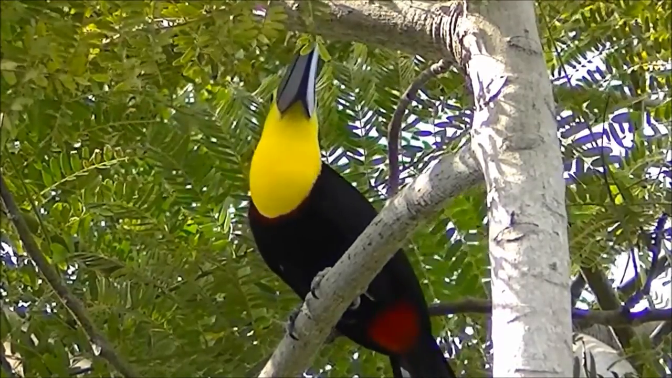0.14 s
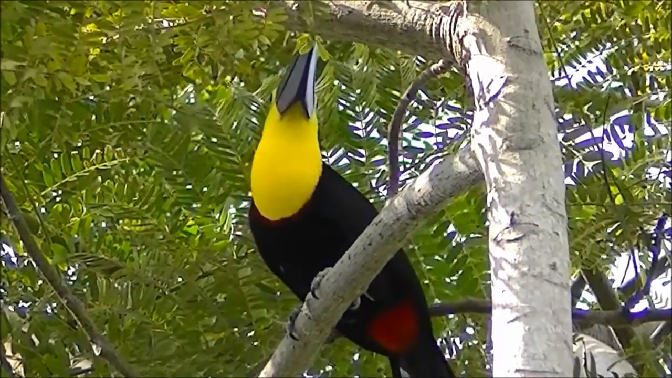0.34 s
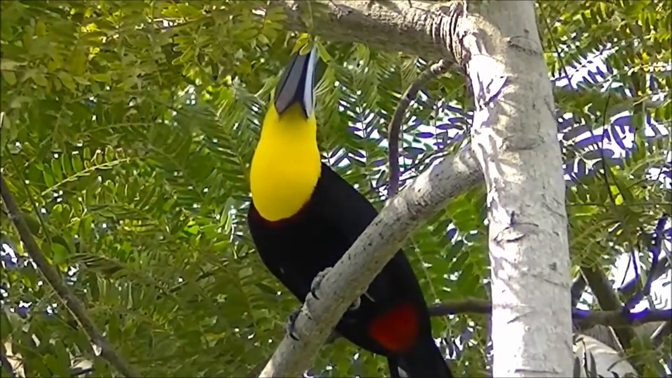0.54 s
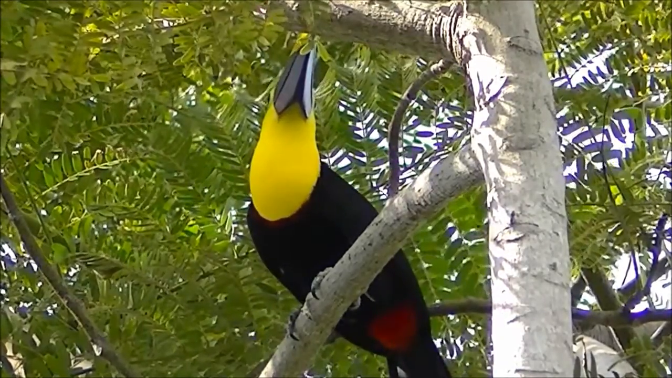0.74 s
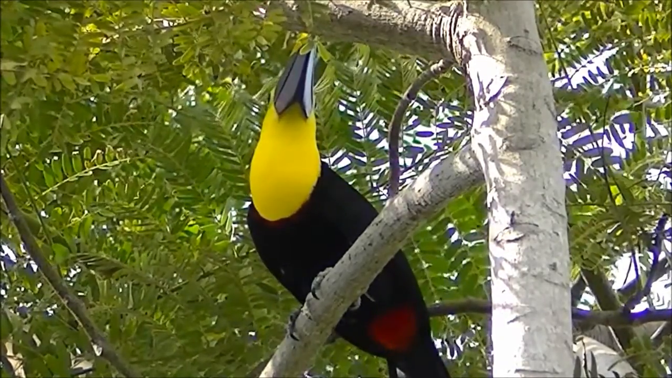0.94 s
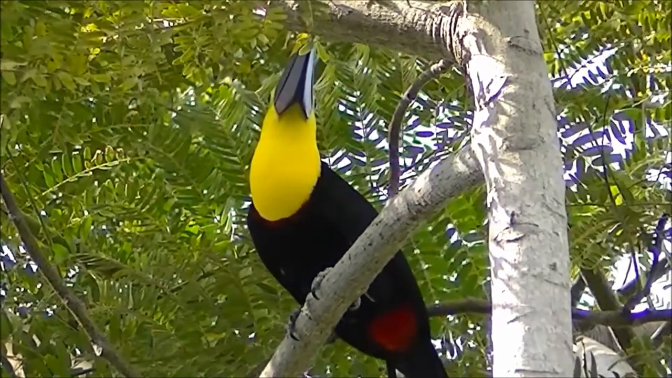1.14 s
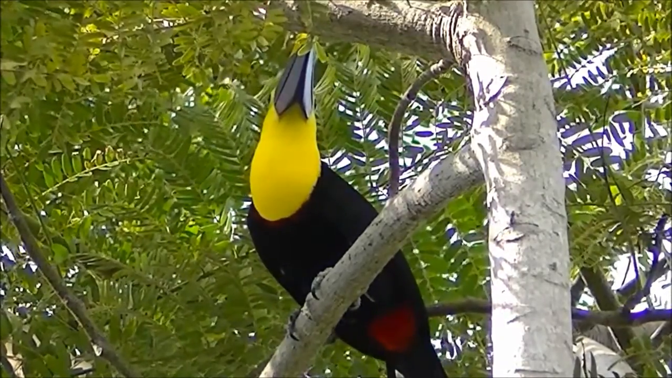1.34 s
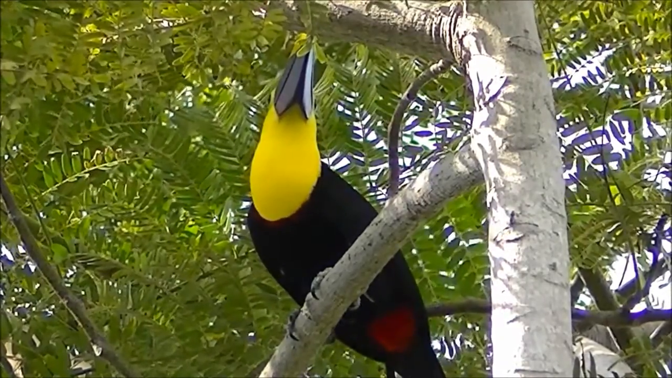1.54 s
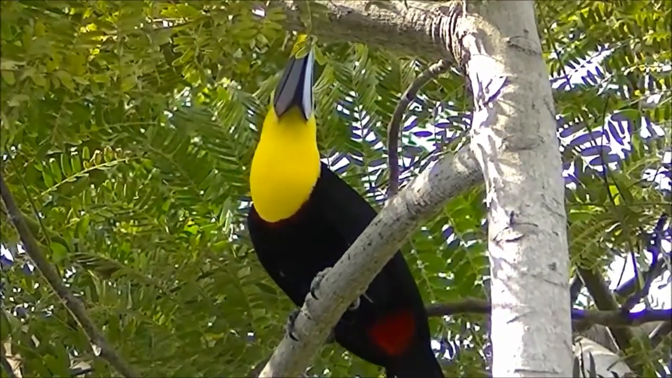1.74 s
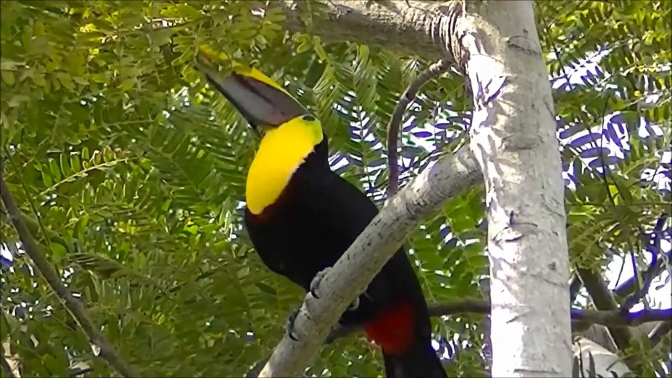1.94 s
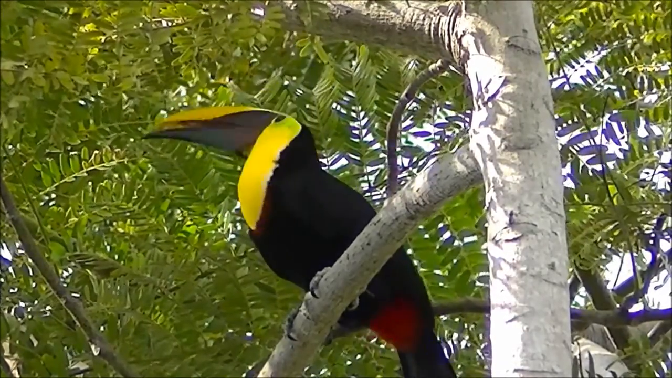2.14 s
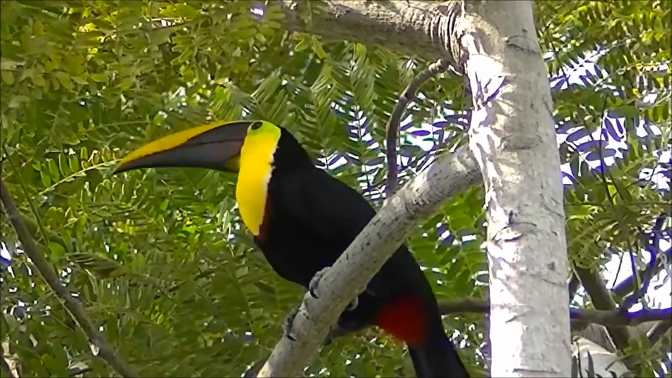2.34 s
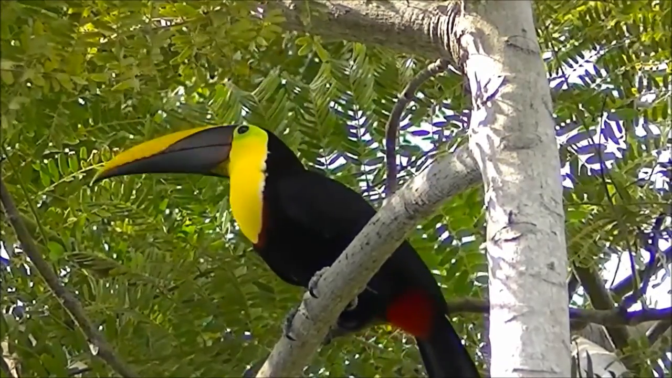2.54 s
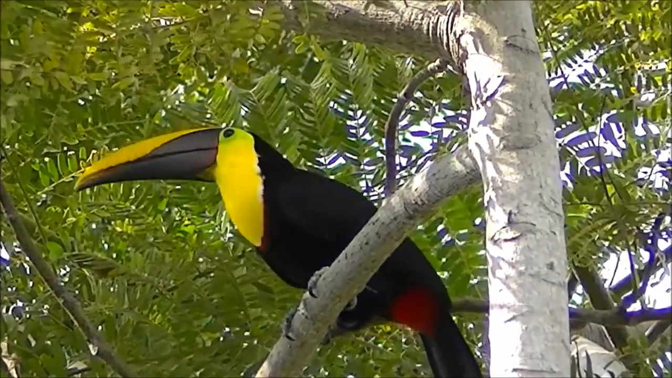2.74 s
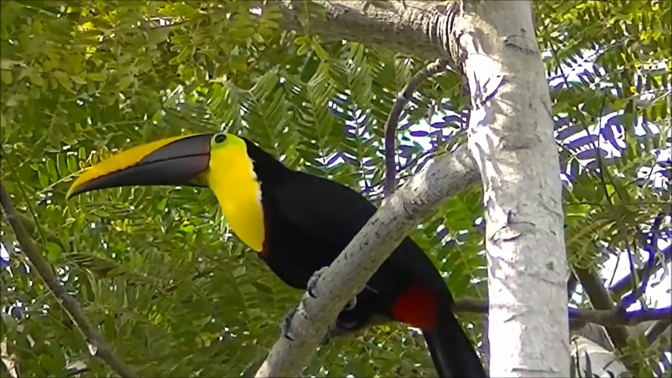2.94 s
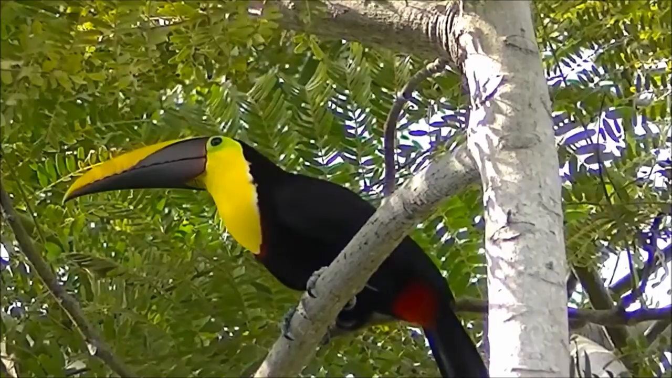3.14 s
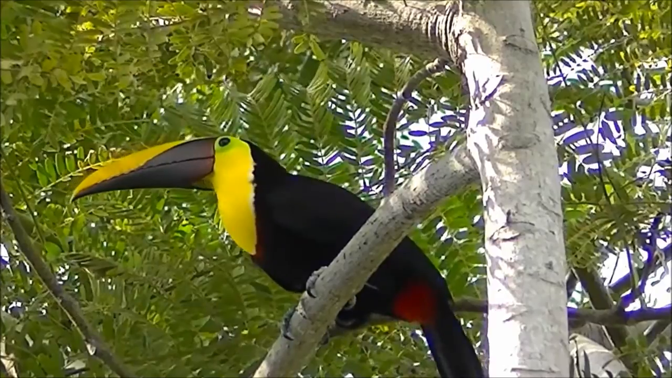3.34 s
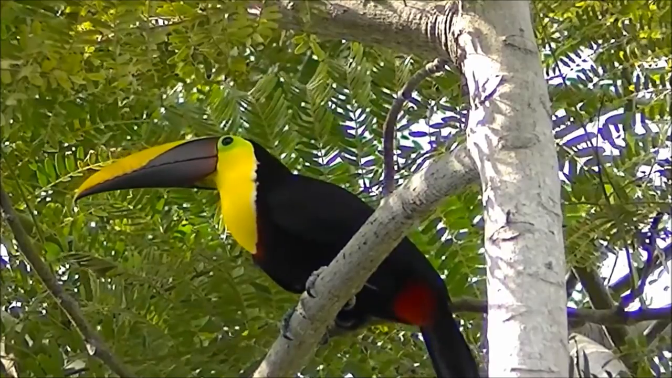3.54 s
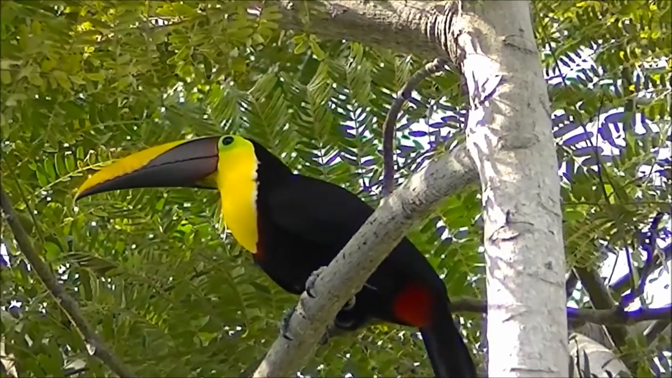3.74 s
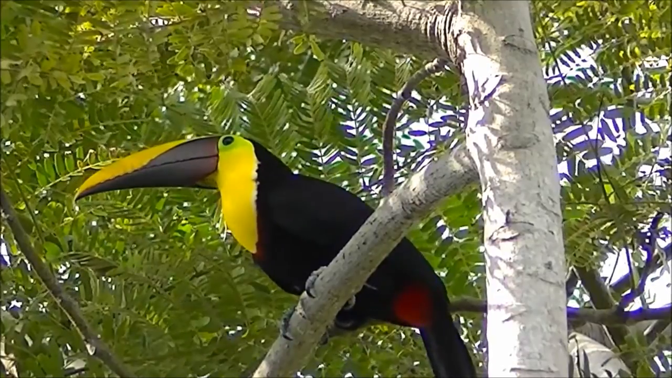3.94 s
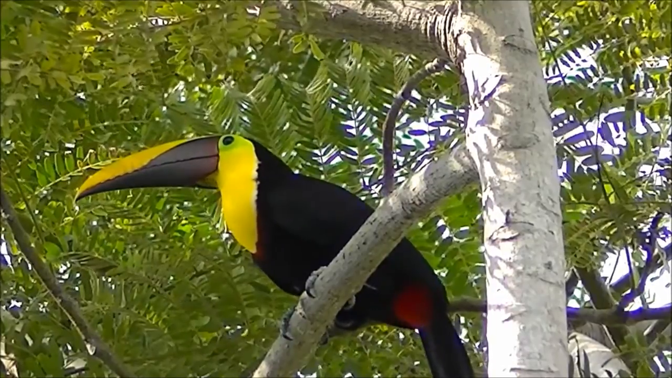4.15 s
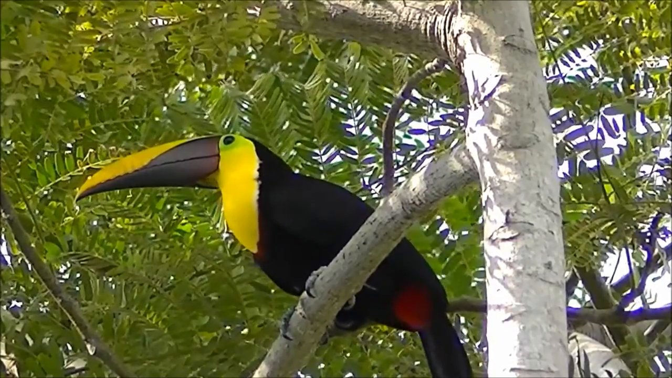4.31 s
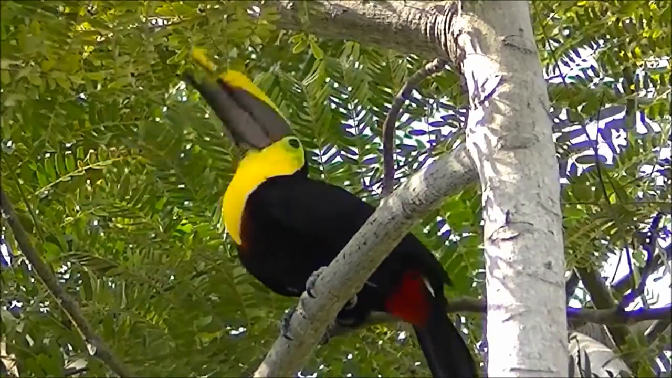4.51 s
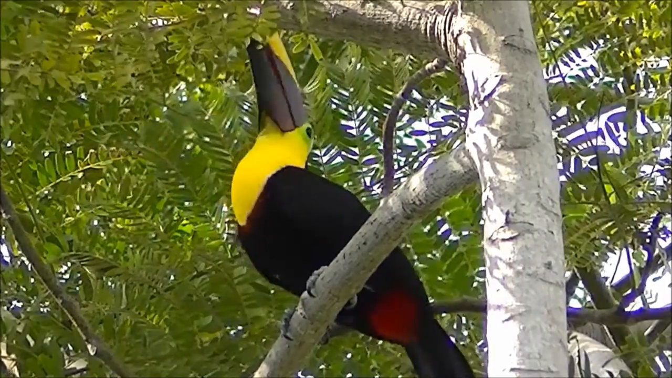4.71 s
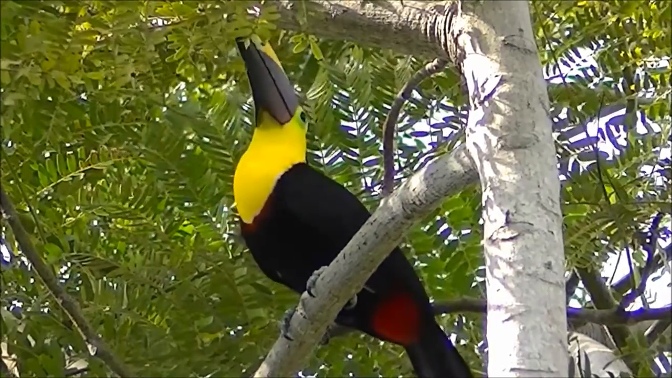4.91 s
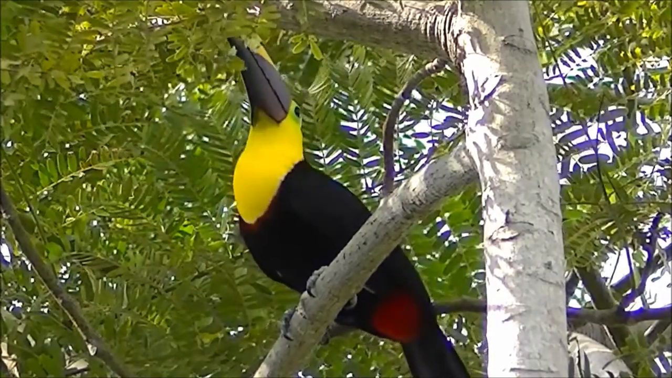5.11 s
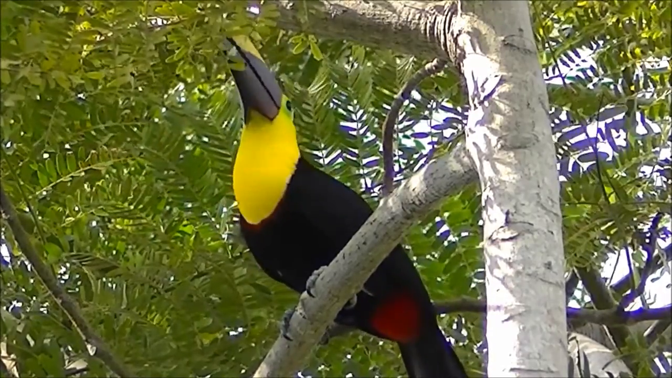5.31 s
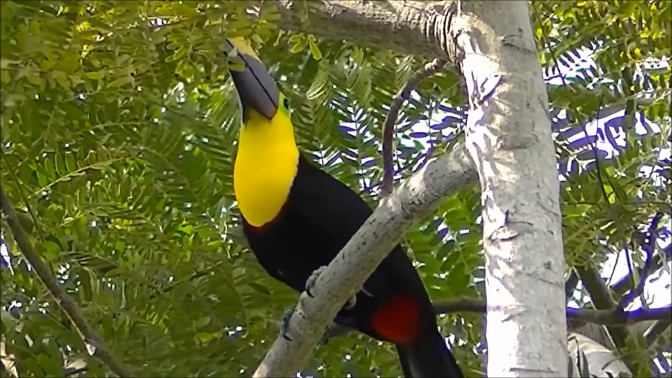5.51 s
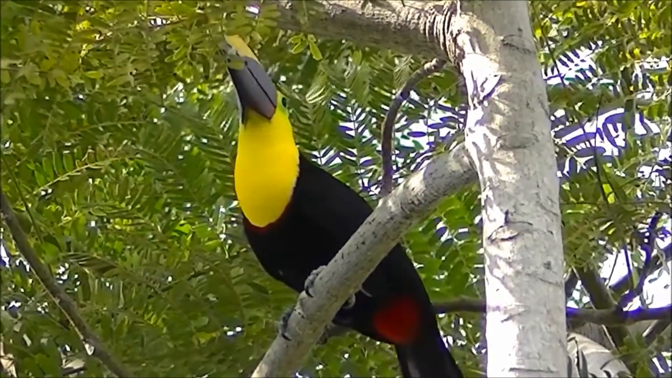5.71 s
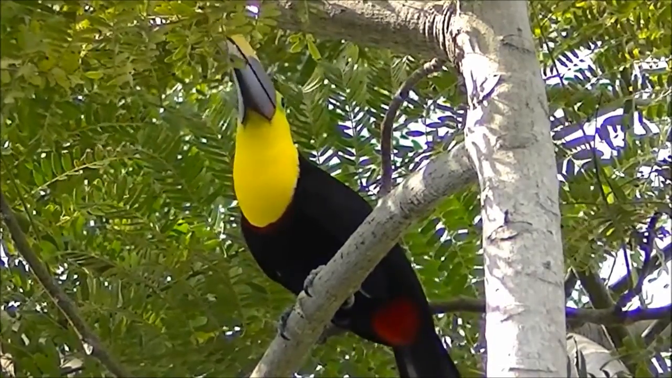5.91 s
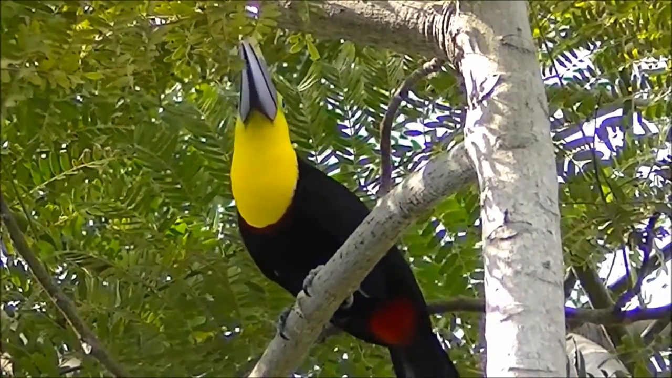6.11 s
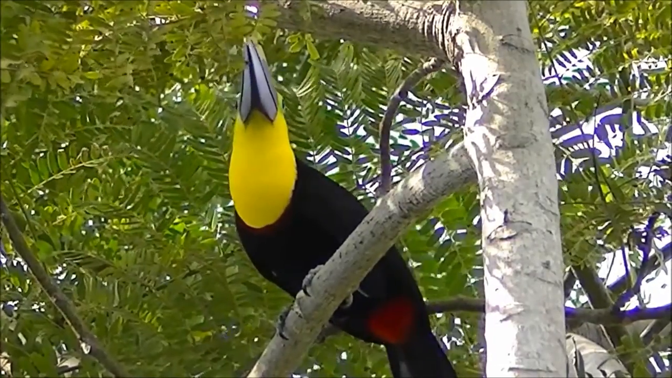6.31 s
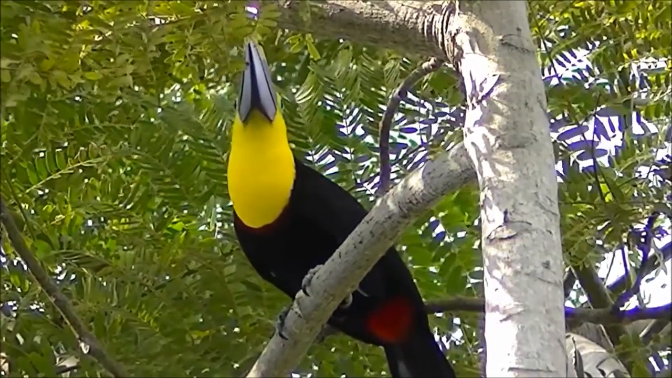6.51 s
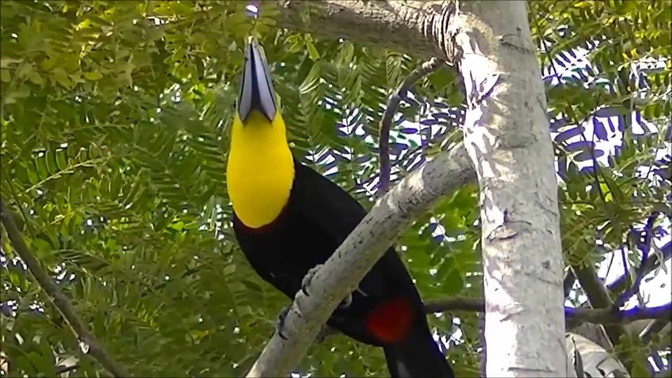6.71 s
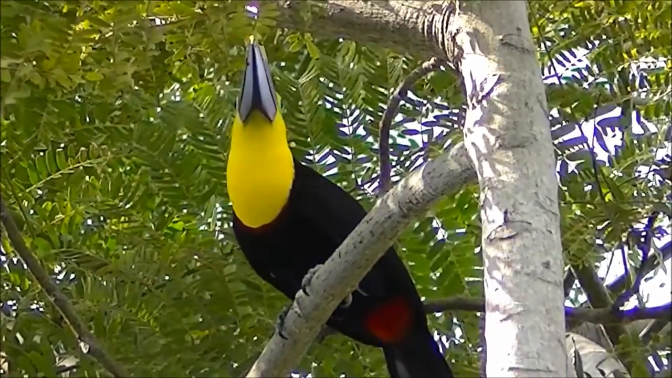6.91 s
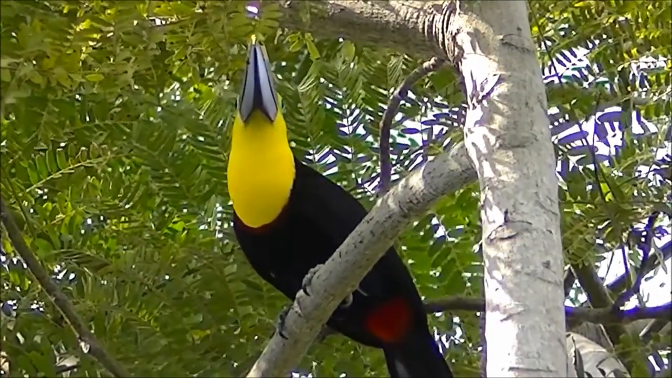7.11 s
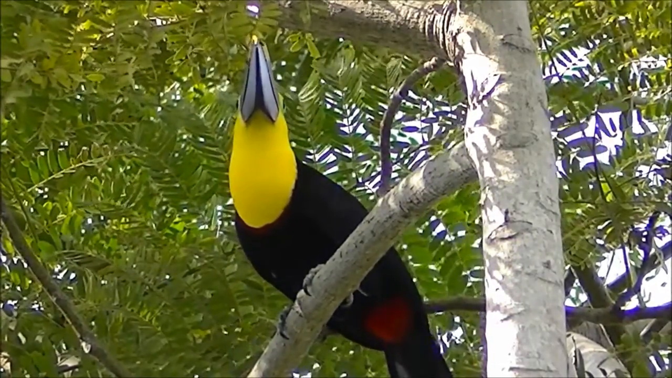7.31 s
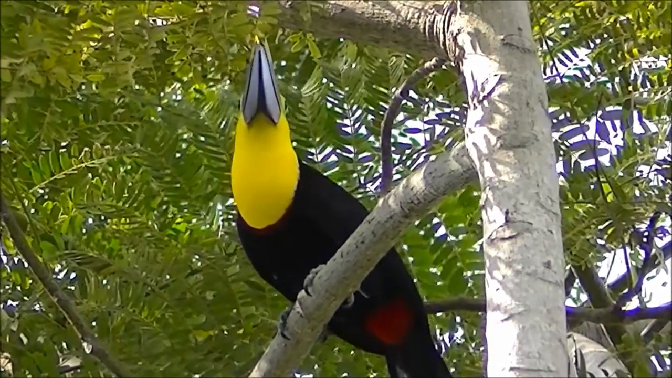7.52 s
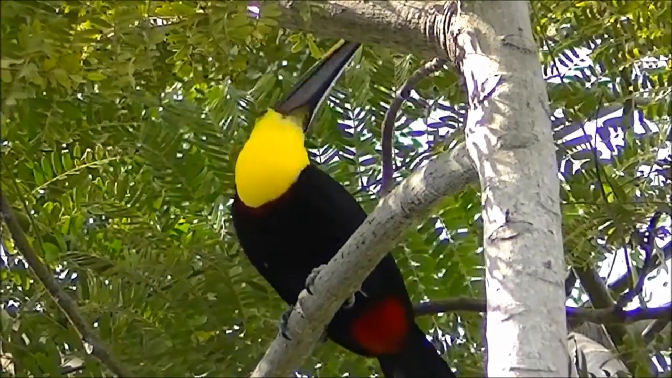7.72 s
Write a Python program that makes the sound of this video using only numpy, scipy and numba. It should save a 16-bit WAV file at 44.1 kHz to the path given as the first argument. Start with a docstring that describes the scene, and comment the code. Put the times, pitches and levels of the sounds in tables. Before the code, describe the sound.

Spaced, gliding toucan yelps ring through tropical treetops, with a higher voice and a distant answer, above faint insects, tiny chirps and low rushing.

```python
"""First the forest echo of a yelp just past rings on, over a low distant rush and hissing insects.
Then toucans yelp in the treetops: one near, a higher-voiced one and a far one answering.
Each yelp is a gliding whistle with overtones; trunks and leaves scatter it into a tail of shaped noise.
Small birds chirp in thin sine sweeps, and a few short bright noise bursts are heard.
An automatic gain control turns everything down after loud yelps, then creeps back."""
import sys
import numpy as np
from scipy import signal
from scipy.fft import rfft, irfft, next_fast_len
from scipy.io import wavfile
from scipy.ndimage import uniform_filter1d
from numba import njit

SR = 44100
rng = np.random.default_rng(int(sys.argv[2]) if len(sys.argv) > 2 else 0)


def invert_db(level):
    """Linear amplitude ratio for a level in decibels (20 dB per decade), elementwise."""
    return 10 ** (np.asarray(level, dtype=float) / 20)


def pcm_store(signal):
    """Save signal as 16-bit PCM."""
    levels = np.round(np.clip(np.atleast_2d(signal), -1, 1) * 32767)
    wavfile.write(sys.argv[1], SR, levels.astype(np.int16).T)


N = 346626
LEAD = SR // 2  # samples made ahead of 0 s and cut off at the end
M = N + LEAD


def on_log_hz(table, hz, column=1):
    """Reads a column of a table that starts with Hz, on a log-frequency axis."""
    table = np.transpose(table)
    return np.interp(np.log(np.maximum(hz, 1.)), np.log(table[0]), table[column])


def walk(rate_hz):
    """Random levels, each held for 1 / rate_hz seconds and smoothed twice; the spread is near 1."""
    hold = int(SR / rate_hz)
    steps = np.repeat(rng.standard_normal(M // hold + 1), hold)
    smooth = uniform_filter1d(uniform_filter1d(steps, hold), hold)
    return 0.75 * smooth[:M]


def band(spectrum, hz, centre_hz, octaves):
    """One smooth slice of a spectrum, back in time, reaching the given octaves to either side."""
    distance = np.clip(np.log2(np.maximum(hz, 1.) / centre_hz) / octaves, -1, 1)
    return irfft(spectrum * np.cos(np.pi / 2 * distance))


def place(x, pan_db, left_lag_s):
    """Left and right of a source off to one side: a level step and a small delay of the left."""
    size = next_fast_len(M + 64, real=True)
    delay = np.exp(-2j * np.pi * np.fft.rfftfreq(size, 1 / SR) * left_lag_s)
    left = irfft(rfft(x, size) * delay, size)[:M]
    return np.array([invert_db(pan_db / 2) * left, invert_db(-pan_db / 2) * x])


def perform(call, start_s, stretch, pitch_factor, level_db):
    """One yelp's course: a call shape stretched, shifted and levelled, with a set-in and a sinking end."""
    attack_s, release_s = 0.008, 0.014
    release_db, release_sink = -35, 0.03  # the sink is a share of the pitch
    s, hz, *levels = np.transpose(call)
    s, hz = start_s + stretch * s, pitch_factor * hz

    def with_ends(curve, before, after):
        return np.concatenate([[curve[0] + before], curve, [curve[-1] + after]])

    return (with_ends(s, -attack_s, release_s), with_ends(hz, 0, -release_sink * hz[-1]),
            *(with_ends(db + level_db, -50, release_db) for db in levels))


# how throat and bill colour the overtones from the third up: (overtone_hz, gain_db)
THROAT_COLOUR = [(4000, 14), (5000, 8), (5700, 3.5), (6600, 0), (7500, -3), (8300, 3.5), (9300, -0.5),
                 (10500, -9), (11300, -14), (13000, -25.5), (15000, -31)]
# how fast the overtones weaken: (pitch_hz, loss_db for each step above the third)
OVERTONE_LOSS = [(1400, 1), (1650, 6), (1850, -1), (2200, 9.5)]


def yelp(course, upper_db, tossed_db, slack_hz, under_db, air_db):
    """A whistle with overtones, hoarse where slack membranes sink in pitch; gives start sample and sound."""
    soften_s, toss_s = 0.0059, 0.049
    waver, rasp = 0.0044, 0.07  # random pitch wobble as shares of the pitch: always, and when slack
    s, *columns = course
    n = np.arange(int(s[0] * SR), int(s[-1] * SR))
    hz, *levels = (np.interp(n / SR, s, column) for column in columns)
    whistle_level, bright = uniform_filter1d(invert_db(np.array(levels)), int(soften_s * SR), axis=1)

    # slack membranes at low pitch swing unevenly and leak air
    slack = np.clip((slack_hz - hz) / 130, 0, 1)
    wobble = (waver + rasp * slack) * walk(700)[:len(n)]
    phase = 2 * np.pi * np.cumsum(hz * (1 + wobble)) / SR

    # a half-pitch undertone and its fifth multiple grow at the loudest moments
    under_level = invert_db(under_db) * (whistle_level / whistle_level.max()) ** 2
    under = under_level * (np.sin(phase / 2) + invert_db(4.5) * np.sin(5 / 2 * phase))

    # as the head is thrown back, the upper overtones settle to the tossed level
    toss = np.exp(-((n - n[0]) / SR / toss_s) ** 2)
    settled_db = tossed_db + (upper_db - tossed_db) * toss
    upper = 0
    for k in range(3, 9):  # multiples of the pitch above the octave
        colour_db = on_log_hz(THROAT_COLOUR, k * hz) - (k - 3) * on_log_hz(OVERTONE_LOSS, hz)
        upper = upper + invert_db(colour_db) * np.sin(k * phase)
    overtones = np.sin(2 * phase) + invert_db(settled_db) * upper

    air = invert_db(air_db) * (slack + 0.051) * np.diff(rng.standard_normal(len(n) + 1))
    whistle = whistle_level * (np.sin(phase) + under + air)
    return n[0] + LEAD, np.sqrt(2) * (whistle + invert_db(-3.5 * slack) * bright * overtones)


# time to fade by 60 dB among trunks and leaves: (pitch_hz, nearby_crowns_s, deep_forest_s)
FOREST_FADE = [(1000, 0.18, 1.07), (1700, 0.25, 0.83), (3480, 0.26, 1.1), (5170, 0.058, 0.64),
               (9000, 0.14, 0.59)]


def forest(x):
    """Dense scatter as noise that builds up quickly and fades at its own pace in each band."""
    build_s, deep_db = 0.0055, -10.5
    alike = 0.21  # likeness of left and right, 0-1
    t, hz = np.arange(SR) / SR, np.fft.rfftfreq(SR, 1 / SR)
    noise = rfft(rng.standard_normal((3, SR)))
    noise = np.sqrt(alike) * noise[2] + np.sqrt(1 - alike) * noise[:2]
    response = 0
    for centre_hz in 500 * 2 ** np.arange(0, 5.5, 0.5):
        near = invert_db(-60 * t / on_log_hz(FOREST_FADE, centre_hz, column=1))
        deep = invert_db(-60 * t / on_log_hz(FOREST_FADE, centre_hz, column=2))
        fade = (1 - np.exp(-t / build_s)) * (near + invert_db(deep_db) * deep)
        response = response + band(noise, hz, centre_hz, 0.72) * fade / np.sqrt(np.sum(fade ** 2))
    return signal.fftconvolve(x[None], response, axes=1)[:, :M]


# Call shapes, all with columns (after_attack_s, pitch_hz, whistle_db, overtones_db);
# the levels of whistle and overtones rise and dip separately along the call.
# Each yelp's own level is added to both.
# long: starts high, drops to a held note that sags, jumps up again and falls away
LONG = [(0, 1845, -12, -17.5), (0.018, 1909, -15.5, -9.5), (.04, 1897, -4.5, -15), (.06, 1744, -6.5, -19),
        (0.079, 1659, -1.5, -25.5), (.13, 1634, -1, -20.5), (.165, 1615, -5, -12.5),
        (.19, 1610, -22, -17.5), (.21, 1562, -9.5, -14), (.25, 1655, -2, -20.5), (.275, 1670, -0.5, -12.5),
        (0.304, 1533, -18, -17.5), (0.319, 1390, -20.5, -22)]
# long, opening lower and sagging deeper: (after_attack_s, pitch_hz, whistle_db, overtones_db)
LONG_LOW = [(0, 1825, -13, -9.5), (.022, 1867, -15.5, -15), (.04, 1843, -6.5, -12), (.058, 1740, -4, -14.5),
            (.078, 1650, -3.5, -23), (0.112, 1629, -5, -25), (.143, 1605, -17, -16.5),
            (.168, 1576, -7, -18), (.198, 1523, -5.5, -18.5), (.223, 1610, -11.5, -16),
            (.243, 1650, 4, -26), (.275, 1620, -4.5, -5.5)]
# short: sags, dips, jumps up and falls away: (after_attack_s, pitch_hz, whistle_db, overtones_db)
SHORT = [(0, 1696, -9.5, -9.5), (.02, 1639, -8.5, -13), (.04, 1620, -18, -7), (.058, 1524, -10.5, -12),
         (.077, 1676, -8, -15), (.095, 1657, 2.5, -8), (.125, 1605, -10.5, -9), (.148, 1561, -5.5, -9),
         (.165, 1373, -15.5, -15)]
# short, lingering in its dip and jumping up later: (after_attack_s, pitch_hz, whistle_db, overtones_db)
SHORT_LATE = [(0, 1680, -7.5, -8), (.02, 1627, -6, -12.5), (.04, 1592, -14.5, -7.5),
              (.057, 1490, -11.5, -14), (.078, 1528, -11.5, -12), (.105, 1668, 0.5, -6),
              (.13, 1617, -2, -9), (.162, 1510, -9.5, -12), (.176, 1390, -15.5, -14)]
# yap: one quick fall: (after_attack_s, pitch_hz, whistle_db, overtones_db)
YAP = [(0, 1672, 1, -6.5), (0.046, 1583, -6.5, -6), (0.061, 1509, -3.5, -5), (.078, 1414, -7, -7),
       (0.093, 1360, -16, -22.5)]
# high voice: swells in, sags, breaks upward to a late accent: (after_attack_s, pitch_hz, whistle_db, overtones_db)
HIGH = [(0, 2110, -24, -46), (.03, 2126, -6, -29), (.06, 2095, 1, -11), (0.096, 2072, -12, -12.5),
        (.13, 1990, -10, -19.5), (.158, 1964, -7, -32), (.178, 2140, -4.5, -21), (.205, 2183, -6.5, -9.5),
        (.235, 2026, -5, -17), (.25, 1800, -19.5, -35)]
# far long call: dies on the sag and is taken up again: (after_attack_s, pitch_hz, whistle_db, overtones_db)
FAR_LONG = [(0, 1774, -4.5, -22), (.033, 1742, -2, -9.5), (.062, 1542, -2.5, -29), (.12, 1490, 0.5, -20.5),
            (.17, 1527, -2.5, -24), (.22, 1511, -6.5, -14.5), (.255, 1392, -17, -30),
            (.275, 1400, -7.5, -26), (.293, 1627, -3, -20.5), (.328, 1575, 0, -12.5),
            (.36, 1427, -9.5, -20)]
# far short call: only glides down: (after_attack_s, pitch_hz, whistle_db, overtones_db)
FAR_SHORT = [(0, 1646, -1.5, -17), (.03, 1552, -6, -17), (.095, 1519, -2.5, -24), (.14, 1519, 0, -21),
             (.165, 1460, -2.5, -15.5), (.195, 1360, -16.5, -24)]
# the call shape of each yelp; the second breaks off on the held note: (shape)
CALL_KIND = [SHORT_LATE, LONG_LOW[:7], HIGH, SHORT, FAR_LONG, FAR_SHORT, YAP, LONG, SHORT_LATE, YAP, YAP,
             LONG_LOW]
# every yelp; the first ends just before 0 s:
# (start_s, time_stretch_factor, pitch_factor, level_db, upper overtones at the attack under the octave_db)
YELPS = [(-.24, 1, .985, -21, -20), (1.906, 0.98, 1.007, -10.5, -14.5), (1.985, 0.96, 0.99, -17.5, -8),
         (2.665, 1.002, 1, -14.5, -30), (2.972, 0.98, 1, -27, -32), (3.705, 0.99, 1, -27.5, -32),
         (3.96, 0.31, 1.15, -33.5, -28), (4.503, 1.007, 1, -9, -31.5), (5.23, 1, 1, -16, -15),
         (5.893, 1, 1, -19.5, -16), (6.069, 0.24, 0.94, -23.5, -12.5), (7.586, 0.98, 1, -10.5, -15.5)]
# who calls each yelp: (bird_number: 0 near, 1 high-voiced, 2 far)
CALLER = [0, 0, 1, 0, 2, 2, 2, 0, 0, 0, 0, 0]
# place and voice of each bird: (left_minus_right_db, left_lag_ms, echo_db,
# echo_left_minus_right_db, half_pitch_undertone_db at the loudest moment, leaking_air_db)
BIRDS = [(-2.5, -0.03, -5.5, 0.5, -74, -28), (2, -0.11, -2.5, -1, -25.5, -46),
         (-4.5, -0.124, -2.5, -0.5, -71, -54)]
# pitch under which each bird's voice goes slack: (pitch_hz)
SLACK_HZ = [1540, 1950, 1420]
# upper overtones under the octave once the head is thrown back, for each bird: (level_db)
TOSSED_DB = [-21.5, -19, -29.5]


def toucans():
    """Every bird's yelps, heard directly from its side and scattered by the forest."""
    voices = np.zeros((len(BIRDS), M + SR))
    for (*row, upper_db), call, who in zip(YELPS, CALL_KIND, CALLER):
        course = perform(call, *row)
        under_db, air_db = BIRDS[who][4:]
        start, sound = yelp(course, upper_db, TOSSED_DB[who], SLACK_HZ[who], under_db, air_db)
        voices[who, start:start + len(sound)] += sound
    out = 0
    for voice, (pan_db, lag_ms, echo_db, echo_pan_db, *_) in zip(voices[:, :M], BIRDS):
        side_db = np.array([[echo_pan_db], [-echo_pan_db]]) / 2
        echo = invert_db(echo_db + side_db) * forest(voice)
        out = out + place(voice, pan_db, lag_ms / 1000) + echo
    return out


LEFT_LAG_S = 0.00011  # the rush and the small birds reach the right side first
# tone of the distant rush, before its overall level is set: (pitch_hz, level_per_hz_db)
RUSH_TONE = [(15, -65.5), (25, -38.5), (129, -6.5), (267, -4), (305, -4.5), (349, -7), (1450, -14.5),
             (1580, -12.5), (2060, -15.5), (3090, -20.5), (3530, -22), (4880, -26), (7500, -29),
             (13900, -43), (15500, -69)]
# how alike left and right are: (pitch_hz, likeness 0-1)
RUSH_ALIKE = [(60, .45), (150, 0.709), (300, 0.71), (700, 0.14), (2000, 0.23), (8000, 0.33)]
# balance of the rush: (pitch_hz, left_minus_right_db)
RUSH_PAN = [(60, -6), (110, -2.5), (200, -5.5), (380, -4), (700, -2.5), (1290, -2.5), (2380, -1.5),
            (4400, -0.5), (8120, -3.5), (15000, -4)]
# slow swells of the rush: (time_s, added_db)
GUST = [(-.5, -2), (.8, -0.5), (1.6, 0.5), (2.5, 1.5), (3.5, 2.5), (4.4, 3), (5.2, -2), (6.2, 1), (7, 1),
        (7.9, -0.5)]


def rush():
    """Far wind and water: noise bands an octave apart that swell together and flicker alone."""
    level_db, swell_db, flicker_db = -41, 0.4, 1.0
    size = M + M % 2
    hz = np.fft.rfftfreq(size, 1 / SR)
    shared, left, right = rfft(rng.standard_normal((3, size)))
    alike = np.clip(on_log_hz(RUSH_ALIKE, hz), 0, 1)
    late = np.exp(-2j * np.pi * hz * LEFT_LAG_S)
    common = shared * np.array([late, np.ones_like(late)])
    pair = np.sqrt(alike) * common + np.sqrt(1 - alike) * np.array([left, right])
    pan_db = np.array([[0.5], [-0.5]]) * on_log_hz(RUSH_PAN, hz)
    pair = pair * invert_db(on_log_hz(RUSH_TONE, hz) + pan_db)
    gust_db = np.interp((np.arange(M) - LEAD) / SR, *np.transpose(GUST))
    swell = swell_db * walk(0.82) + gust_db
    out = 0
    for centre_hz in 20 * 2. ** np.arange(11):
        flicker = flicker_db * walk(6.9)
        out = out + band(pair, hz, centre_hz, 0.77)[:, :M] * invert_db(swell + flicker)
    return invert_db(level_db) * out / np.sqrt(np.mean(out ** 2))


# insect choruses: (centre_hz, width_hz, level_db)
INSECTS = [(5510, 630, -63.5), (7580, 640, -62.5), (10100, 1100, -67.5)]


def insects():
    """Narrow hissing noise bands of many far singers, throbbing unevenly."""
    throb_db = 1.5
    size, out = M + M % 2, 0
    hz = np.fft.rfftfreq(size, 1 / SR)
    for centre_hz, width_hz, level_db in INSECTS:
        noise = rfft(rng.standard_normal((2, size)))
        hiss = band(noise, hz, centre_hz, width_hz / centre_hz)[:, :M]
        out = out + invert_db(level_db + throb_db * walk(30)) * hiss / hiss.std()
    return out


# chirps of small birds: (start_s, length_s, from_hz, to_hz, level_db)
CHIRPS = [(0.299, 0.021, 7960, 9650, -61), (0.987, .09, 3686, 3540, -58), (1.25, 0.015, 7130, 9000, -55),
          (4.242, 0.037, 7420, 8200, -51.5), (5.855, .03, 7340, 8900, -56), (6.366, 0.027, 7010, 9000, -55),
          (7.125, 0.033, 7200, 8740, -57)]


def small_birds():
    """Thin quick sine sweeps, mostly upward, with a forest echo."""
    x = np.zeros(M)
    for start_s, length_s, from_hz, to_hz, level_db in CHIRPS:
        count, start = int(length_s * SR), int(start_s * SR) + LEAD
        phase = 2 * np.pi * np.cumsum(np.linspace(from_hz, to_hz, count)) / SR
        x[start:start + count] = invert_db(level_db) * np.hanning(count) * 2 * np.sin(phase)
    return place(x, -2.7, LEFT_LAG_S) + invert_db(-7.5) * forest(x)


# short bright noise bursts; the one at 2.845 s is a faint broadband tick: (start_s, length_s, level_db)
BURSTS = [(2.548, 0.02, -74), (2.618, 0.014, -62), (2.845, 0.022, -57.5), (6.035, 0.049, -62),
          (6.19, 0.087, -72), (6.58, .05, -70)]


def bright_bursts():
    """Short bright noise bursts, without echo; taking differences of noise favours the treble."""
    x = np.zeros((2, M))
    for start_s, length_s, level_db in BURSTS:
        count, start = int(length_s * SR), int(start_s * SR) + LEAD
        bright_noise = np.diff(rng.standard_normal((2, count + 1)))
        x[:, start:start + count] = invert_db(level_db) * np.hanning(count) * bright_noise
    return x


def scene():
    """All sounds together; the lead-in is cut off, so the first yelp is heard only as it rings on."""
    mix = toucans() + rush() + insects() + small_birds() + bright_bursts()
    return mix[:, LEAD:]


@njit
def follow(x, attack, release):
    """Envelope that rises fast and sinks slowly."""
    e, out = x[0], np.empty(len(x))
    for i in range(len(x)):
        e += (x[i] - e) * (attack if x[i] > e else release)
        out[i] = e
    return out


def band_limit(x):
    """A steep low-pass at the top of the band."""
    return signal.sosfilt(signal.butter(12, 15660, fs=SR, output="sos"), x)


def record(dry):
    """Gain control turns down after loud yelps and creeps back; it starts out still lowered."""
    knee_db, slope = -28, 0.24
    attack_s, release_s = 0.094, 0.65
    earlier_db = -20  # envelope level at the start
    loud = np.concatenate([[invert_db(earlier_db)], np.abs(dry).max(axis=0)[1:]])
    envelope = follow(loud, 1 / (attack_s * SR), 1 / (release_s * SR))
    gain = (1 + envelope / invert_db(knee_db)) ** -slope
    return band_limit(dry * gain)


dry = scene()
out = record(dry)
pcm_store(out)
```